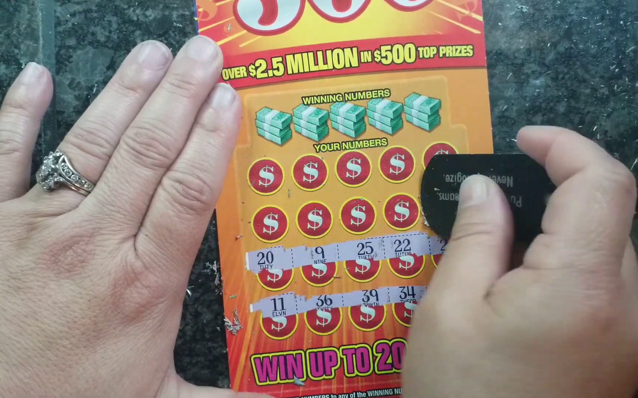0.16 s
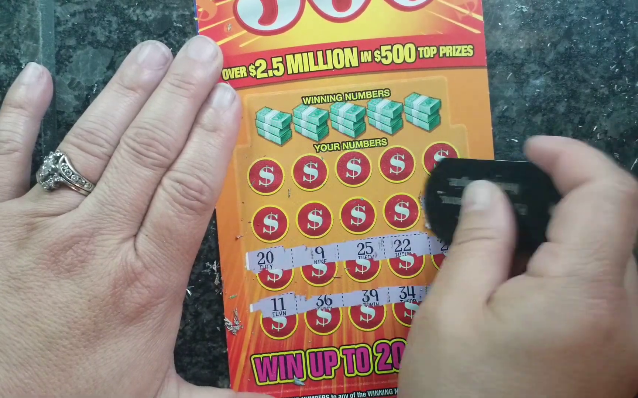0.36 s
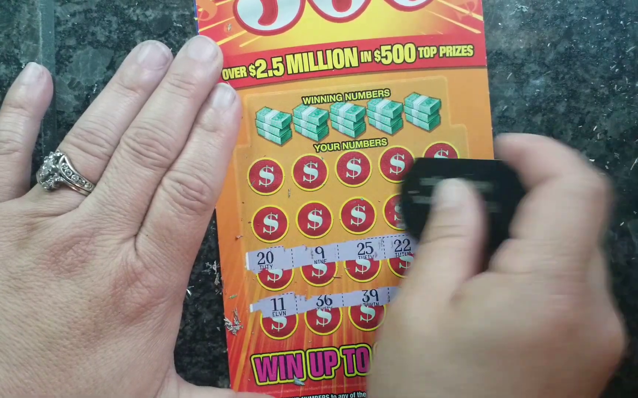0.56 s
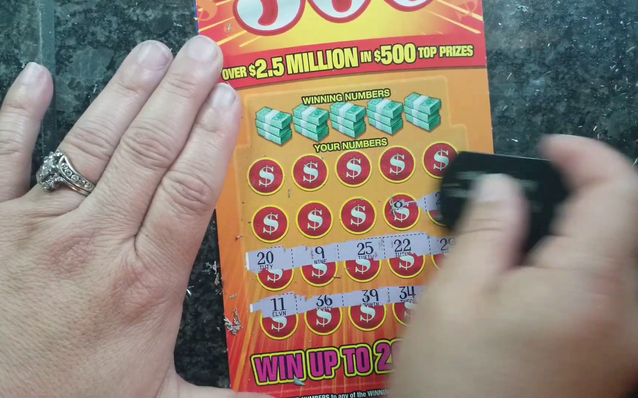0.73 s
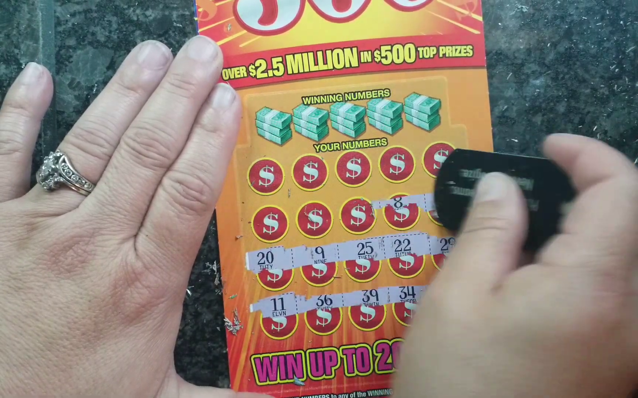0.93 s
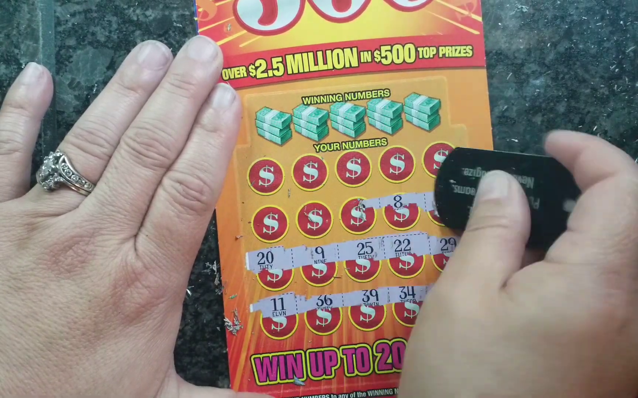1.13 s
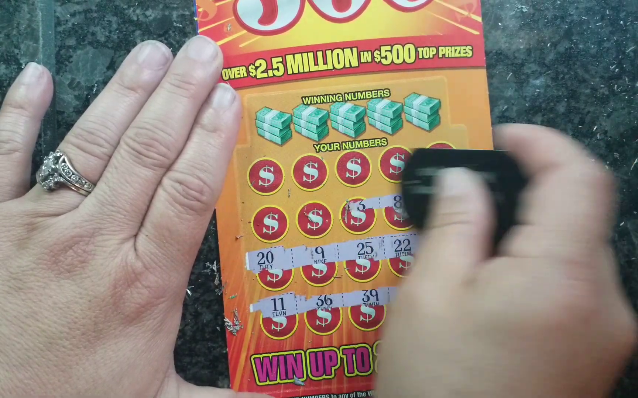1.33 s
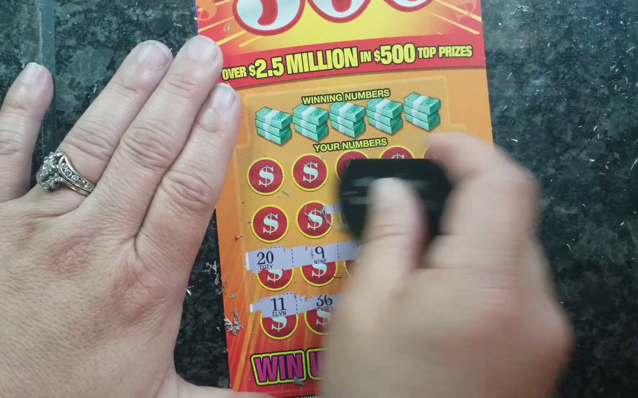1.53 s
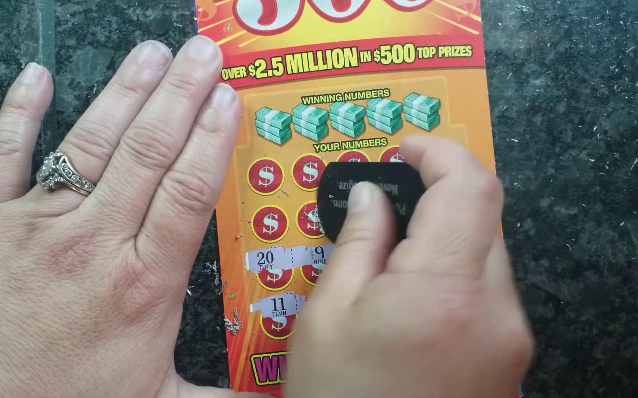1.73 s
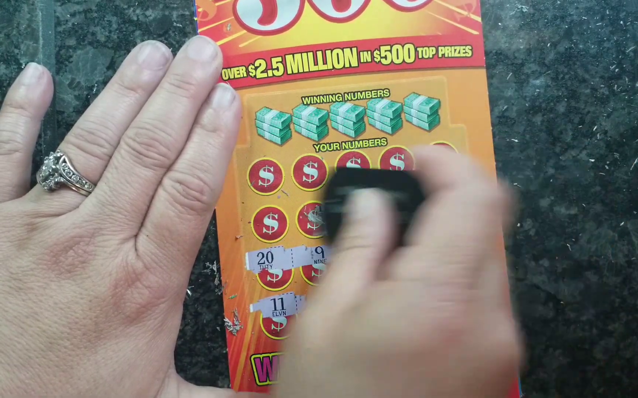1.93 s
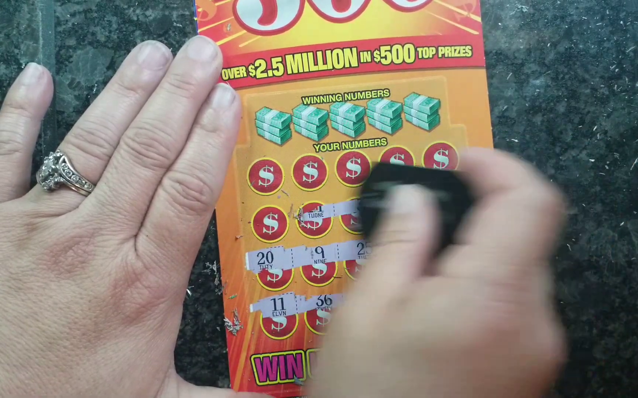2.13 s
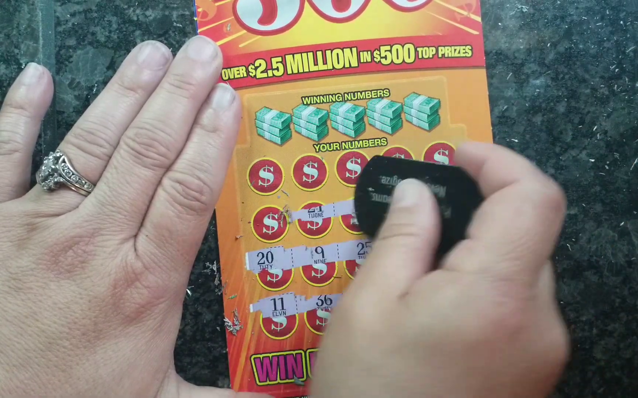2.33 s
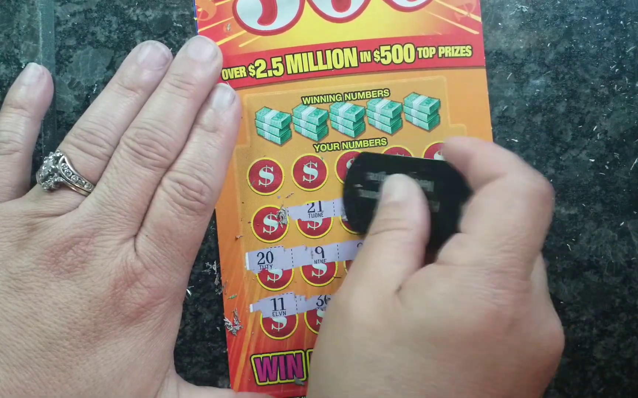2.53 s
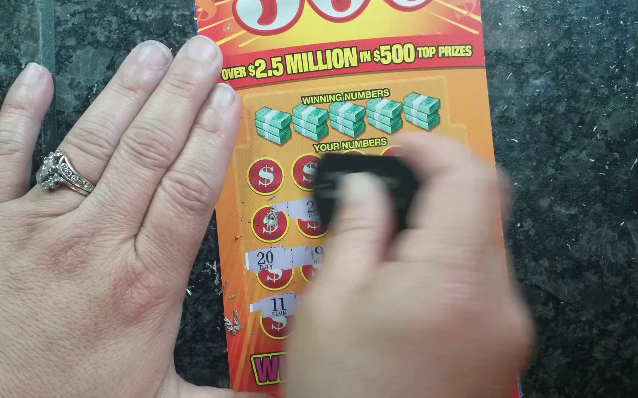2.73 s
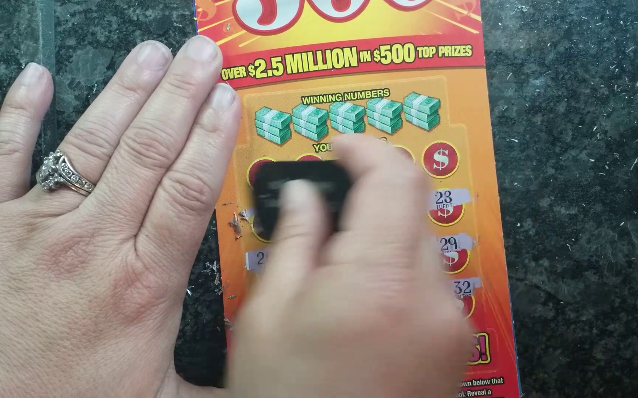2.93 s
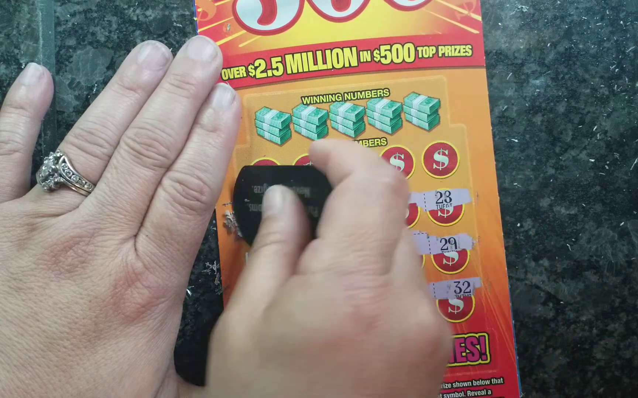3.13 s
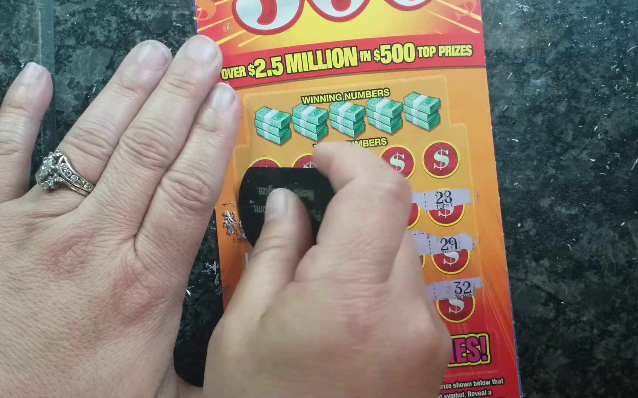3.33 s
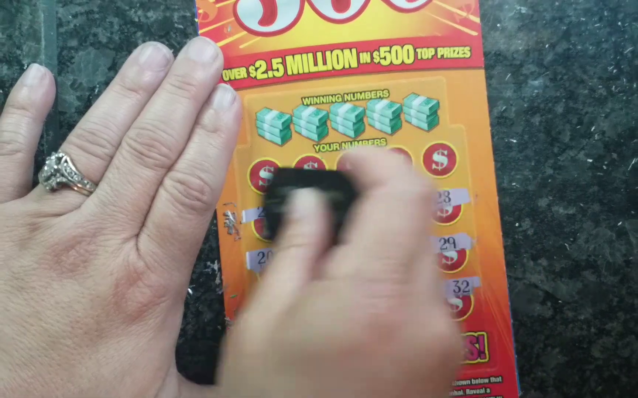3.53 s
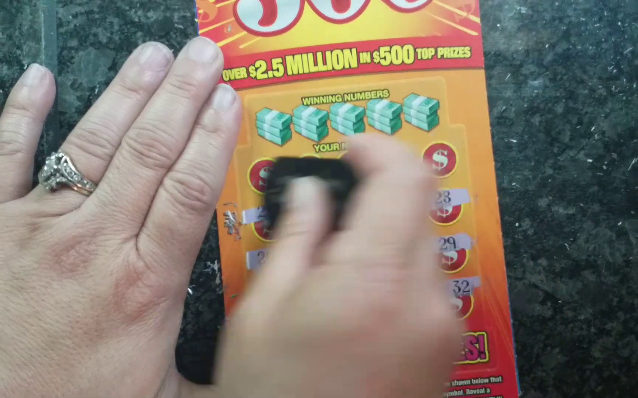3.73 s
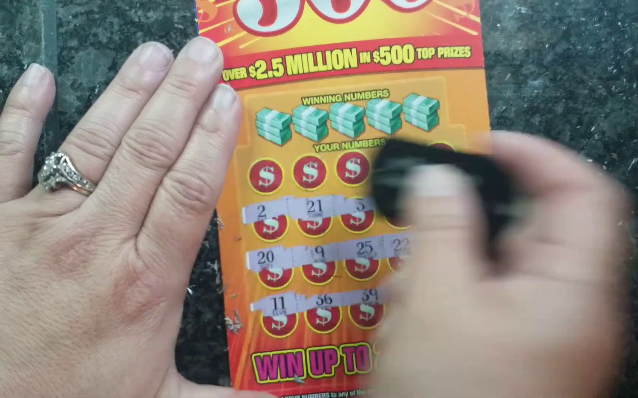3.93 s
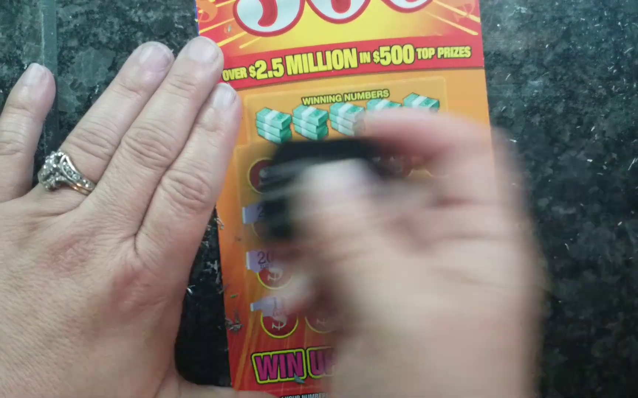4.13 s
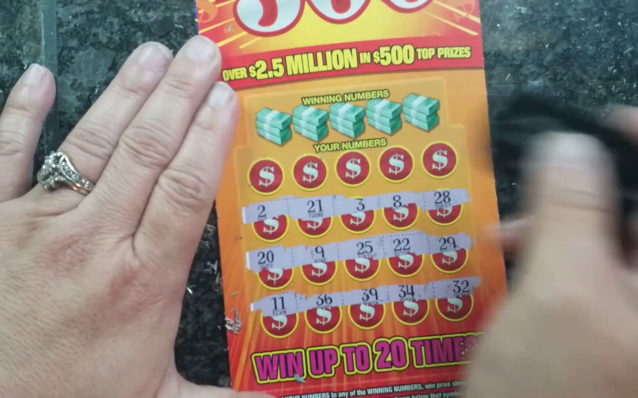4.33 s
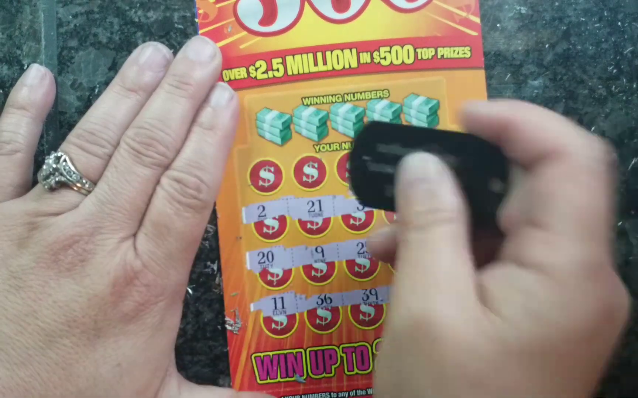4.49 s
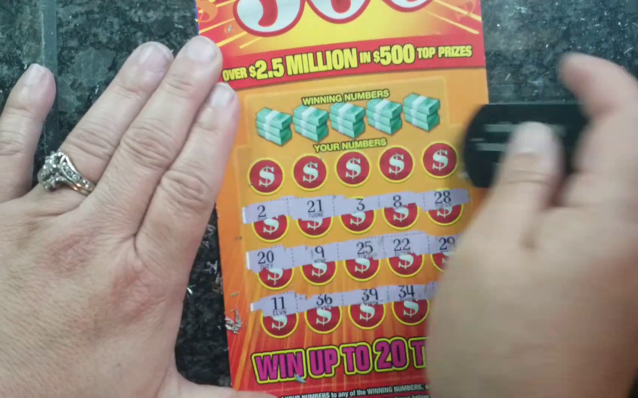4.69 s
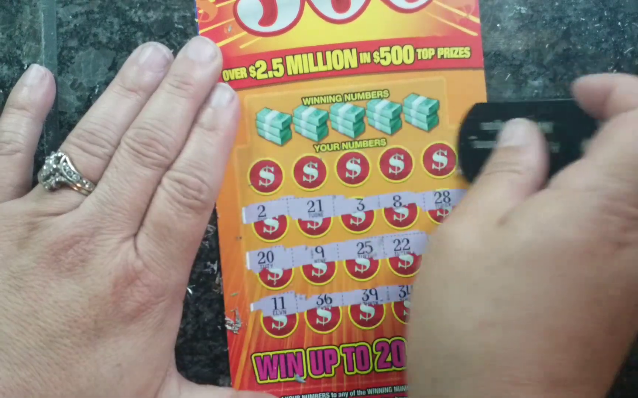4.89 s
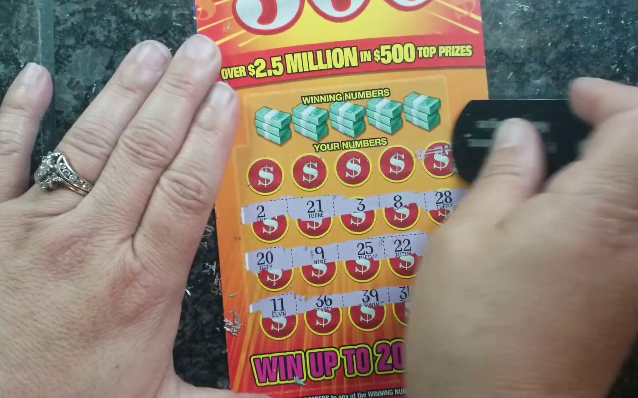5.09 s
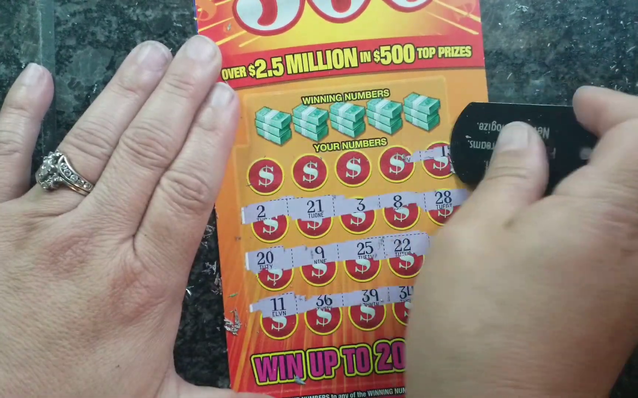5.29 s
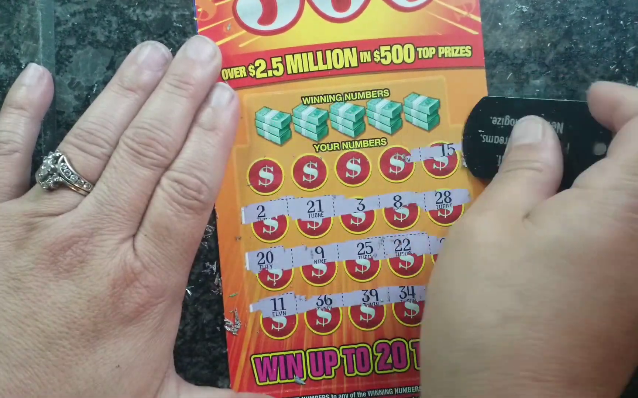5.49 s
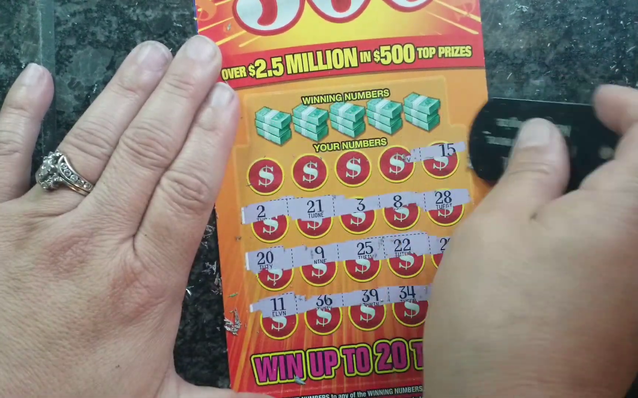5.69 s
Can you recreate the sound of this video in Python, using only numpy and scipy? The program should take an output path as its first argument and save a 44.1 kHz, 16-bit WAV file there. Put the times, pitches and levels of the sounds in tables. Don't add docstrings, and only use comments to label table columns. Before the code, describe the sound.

Rapid papery rasps, pushes fuller and pulls more edgy, with gritty crackle, small snags and faint low counter thuds beneath. After almost four seconds they stop; a hard click, a lighter knock and soft sweeping fill about a second. Then a slightly thinner scraping starts again at the right and continues until the cut. Two close microphones look down in a hushed indoor room.

```python
import sys
import numpy as np
from scipy import signal
from scipy.io import wavfile
from scipy.ndimage import uniform_filter1d, map_coordinates

SR = 44100
rng = np.random.default_rng(int(sys.argv[2]) if len(sys.argv) > 2 else 0)


def dump_mix(stems):
    frames = np.atleast_2d(stems).T
    limited = np.clip(frames, -1, 1)
    pcm = np.round(limited * 32767).astype(np.int16)
    wavfile.write(sys.argv[1], SR, pcm)


def undo_db(level):
    steps = np.asarray(level, float) / 20
    return 10 ** steps


N = 253575
TIME_S = np.arange(N) / SR

# frequency in Hz, level in dB per Hz.
ROOM_TONE = [(20, -40), (30, 0), (45, -2), (65, 6.5), (95, -12), (160, -7), (230, -12), (350, -16),
             (600, -18.5), (1000, -18.5), (3000, -20.5), (7000, -27), (12000, -20), (15000, -31)]
# frequency in Hz, likeness from 0 to 1.
LIKENESS = [(40, 0.31), (150, 0.45), (300, 0.2), (650, 0.5), (1400, 0.02), (15000, 0.0089)]
ROOM_DB = -70

# time in seconds, left port's delay in samples, left minus right in dB.
TAG_PLACE = [(0, 0.5, 2), (1.4, 0.94, 0.6), (1.75, -1.5, 0.3), (2.9, -2, 1.5), (3.2, -3, 1.5),
             (4.4, -2, 2.2), (4.95, 1.06, 1.5), (5.75, 0.16, 1)]
# time in seconds, stiffness of the sheet under it in dB,
# resting contact between strokes in dB, echo off the hand in ms.
GRIP = [(0, 0.5, -74, 0.35), (.4, 1.5, -70, 0.33), (.62, 1, -69, .34), (.85, -2, -83, 0.35),
        (1.1, 1, -69, 0.33), (1.4, 1, -70, .34), (1.75, -0.5, -71, .34), (2.0, -3.5, -71, .34),
        (2.3, 1.5, -72, 0.33), (2.6, 1.5, -65, 0.33), (2.9, 0, -71, 0.33), (3.3, 0.5, -64.5, .34),
        (3.6, -1, -65, 0.333), (3.88, -0.5, -66, 0.37), (3.95, -4, -95, .34), (4.93, 1.5, -91, .34),
        (5.0, -0.5, -78, 0.35), (5.75, 0, -75, 0.35)]
ECHO_S, ECHO_GAIN = .00153, 0.32

# frequency in Hz, width in Hz, level in dB.
SWAY_MODES = [(73.6, 18, -10), (87.8, 28.7, -8), (125.7, 10, -4)]
THUD_MODES = [(164.3, 19, -4), (183, 56, -6.5)]
RUMBLE_MODES = [(294.6, 50, -3.5), (513, 57, -6.5), (581, 170, -9.5), (828, 210, -9)]
# time in seconds, sway in dB.
LEAN = [(0, -68), (0.5, -71.5), (1.5, -65.5), (3.8, -66.5), (4.15, -75), (4.8, -78), (5.3, -73),
        (5.75, -65)]
# start in seconds, length in seconds, sway in dB, thud in dB, rumble in dB.
BUMPS = [(0.0, 0.024, -65, -53.5, -100), (0.62, 0.061, -80, -61, -74), (0.82, 0.028, -58, -85, -96),
         (3.903, 0.042, -80, -68.5, -75), (4.049, 0.012, -53, -61, -83), (4.249, 0.11, -67, -61, -75.5),
         (4.333, 0.043, -74, -44, -55), (4.382, 0.033, -78, -48, -56.5), (4.442, 0.2, -81, -78, -72.5),
         (4.583, 0.085, -59, -52.5, -71), (4.985, 0.023, -58, -67.5, -80.5), (5.216, 0.036, -71, -63, -73),
         (5.293, 0.089, -60.5, -51, -71), (5.62, 0.033, -71, -81, -70.5), (5.745, 0.029, -66, -56, -74)]
BUMP_RISE_S, BUMP_FALL_S = 0.015, 0.084
PUSH_THUD_DB, RESTING_THUD_DB, SWAY_WOBBLE_DB = -30.5, -83.5, 3.5

# start in seconds, length in seconds, level in dB,
# centre in Hz, width in Hz.
RUBS = [(3.942, 0.069, -73.5, 5100, 4000), (4.089, 0.027, -70, 5100, 3500), (4.115, 0.012, -75, 4500, 3000),
        (4.23, 0.056, -86, 2800, 2500), (4.331, 0.11, -61.5, 1900, 1800), (4.39, 0.17, -65, 2900, 2520),
        (4.552, 0.13, -74.5, 3030, 3000), (4.56, 0.093, -77, 7100, 1500), (4.627, 0.051, -71.5, 5800, 2500),
        (4.623, 0.032, -78, 2480, 2000), (4.664, 0.15, -74, 6850, 1830), (4.697, 0.18, -79.5, 3300, 2500),
        (4.8, 0.047, -68, 7000, 2500), (4.8465, 0.068, -61.5, 2980, 1500), (4.962, 0.17, -56, 3000, 4240)]

# time in seconds, peak in dB, thud in dB, crack decay in seconds,
# brightness in dB per octave.
TAPS = [
    (4.3308, -20.5, -52.5, 0.035, 0),
    (4.4426, -41.5, -73, 0.0075, -6),
    (4.572, -62, -81, 0.013, 0.1),
    (4.8015, -75, -102, 0.024, 0.1),
    (4.8448, -40, -93, 0.008, 0),
]
# time in seconds, peak in dB.
HEEL_THUDS = [
    (0.387, -45.5),
    (0.63, -43),
    (1.294, -47.5),
    (2.923, -47),
    (4.046, -57),
]
# frequency in Hz, level in dB, time to fall 60 dB in seconds.
KNOCK = [(95, 6.5, 0.038), (183, 2.5, 0.024), (270, -12, 0.086), (577, 6.5, 0.016), (736, 3, 0.057)]
CLINK = [(1586, 2, 0.028), (2000, -6.5, 0.022), (2624, -1, 0.024), (3300, -1, 0.0097), (4730, 5, 0.017),
         (5480, -2.5, 0.051), (6170, 9.5, 0.007), (7280, 1.5, 0.04)]

# frequency in Hz, width in Hz, level in dB.
TICKET = [(1961, 140, -15), (2292, 110, -24.5), (3422, 657, -5.5), (4225, 600, 2), (5064, 770, -4.5),
          (6750, 2600, -5), (6895, 960, 1.5), (9140, 3000, -7.5), (12100, 2100, -30), (12440, 1400, -22.5)]
TAG = [(2650, 24, -64), (4486, 53, 3), (7070, 350, 3), (7746, 150, 0.5), (10200, 520, -2.5)]
# bite in seconds, hold in seconds, level in dB, swell over the hold in dB, edge ring in dB.
PUSHES = [(0.0, 0.024, -42, -3.5, -3), (0.184, 0.038, -43, 11, -0.5), (0.39, 0.045, -38, -3, -3),
          (0.624, 0.034, -39.5, -19, 0), (0.827, 0.04, -35.5, -2, -1.5), (1.024, 0.057, -38, 12.5, -2.5),
          (1.252, 0.058, -41, 20, -6), (1.484, 0.062, -39, 7.5, -1), (1.735, 0.046, -39, 10.5, -3),
          (1.956, 0.067, -36.5, 11, -2), (2.206, 0.057, -40.5, 16, -5), (2.431, 0.055, -39, 9.5, 0.5),
          (2.659, 0.066, -38.5, 3, -0.5), (2.886, 0.085, -45, -4, -2.5), (3.112, 0.061, -43.5, 13, 0.5),
          (3.361, 0.033, -38.5, 5, 1), (3.589, 0.042, -40, 3, -1), (3.785, 0.057, -38, 3, -2),
          (4.982, 0.039, -37.5, 8, 3.5), (5.185, 0.043, -39.5, 0.5, 4), (5.421, 0.02, -39.5, 2, 4),
          (5.614, 0.029, -43, 9, 0.5)]
PULLS = [(0.071, 0.0071, -53.5, 27, -5.5), (0.286, 0.032, -38.5, 0.5, -1.5),
         (0.492, 0.034, -54.5, -11, -11), (0.712, 0.014, -38.5, 6, 2.5), (0.928, 0.034, -39.5, -11.5, -2),
         (1.138, 0.048, -43.5, 3.5, 3), (1.364, 0.057, -41, 2, 0.5), (1.593, 0.019, -43, 15, -6),
         (1.848, 0.054, -47, -12, -1), (2.075, 0.011, -43.5, 15.5, -2), (2.328, 0.053, -42.0, -12, -0.5),
         (2.565, 0.039, -39.5, -3.5, 0.5), (2.788, 0.042, -45, 11, -1), (3.014, 0.045, -40, -3.5, 0.5),
         (3.201, 0.076, -51, 9, -8.5), (3.458, 0.055, -49, -2, -3.5), (3.704, 0.025, -44.5, 10, 1.5),
         (3.883, 0.033, -53, 8.5, -3), (5.088, 0.033, -42, -7.5, -2), (5.297, 0.046, -40, -3, 1),
         (5.506, 0.046, -41, 7, 1.5), (5.705, 0.095, -54.5, 15, -1.5)]
SLIDES = [(0.123, 0.011, -58, -25, 1.5), (0.527, 0.0031, -50.5, 14.5, 4), (0.588, 0.043, -58, -4, -3),
          (0.965, 0.0057, -44.5, -13, 4.5), (1.629, 0.038, -58.5, -13, 5.5),
          (2.101, 0.049, -52.5, -10, -4.5), (2.932, 0.038, -39, -13.5, -15), (3.246, 0.012, -46, -10, 5),
          (3.293, 0.0026, -68, -16, 3), (3.682, 0.031, -60.5, -5, 7.5), (4.34, 0.046, -42.5, 9, 2),
          (4.861, 0.053, -61.5, -0.5, 8)]
CREEP_S, BITE_S, LET_GO_S, TRAIL_S = 0.025, 0.022, 0.016, 0.025
CREEP_DB, LET_GO_DB, STROKE_GAIN_DB = -27, -16.5, 2.5
# paper body, edge ring, sizzle and paper boom, all in dB.
PUSH_COLOUR, PULL_COLOUR = (0, -1.5, -3, 2.5), (1.5, 2, -1.5, -7.5)
SLIDE_COLOUR = (-0.5, -5, 4.5, -1.5)
USUAL_DB, SIZZLE_PER_DB = -41, 0.7
FIRMNESS_SIZZLE = 0.074
NEW_ROW_S, NEW_ROW_BODY_DB, NEW_ROW_AIR_DB, NEW_ROW_LOW_DB = 4.8, -1.5, -13, 12.5
# time in seconds, peak in dB.
SNAGS = [(0.0812, -37), (0.2762, -23), (0.3865, -29), (0.4923, -36), (0.53, -32), (0.623, -12),
         (0.7068, -33), (0.822, -38), (0.841, -21.5), (0.9207, -26), (1.0225, -22), (1.078, -12),
         (1.181, -26), (1.281, -22.5), (1.3019, -20), (1.377, -23), (1.413, -37), (1.524, -14),
         (1.5995, -26), (1.736, -31), (1.756, -18), (1.775, -38), (1.846, -31), (1.951, -18.5),
         (1.9689, -21), (2.0822, -35), (2.2528, -20), (2.322, -24), (2.556, -29), (2.655, -39),
         (2.9282, -9.5), (3.0116, -29), (3.1423, -21), (3.248, -33), (3.297, -26.5), (3.3747, -21),
         (3.5867, -30.5), (4.327, -28), (4.3303, -19), (4.8452, -46), (4.9792, -29), (5.084, -27),
         (5.181, -20), (5.204, -16), (5.289, -15), (5.3395, -22.5), (5.4182, -27), (5.4995, -29.5),
         (5.6127, -40), (5.6332, -28)]
# time in seconds, loss in dB.
SKIPS = [(0.373, 7), (0.416, 1.5), (0.63, -0.5), (0.958, 8), (1.16, 0.5), (1.29, 7), (1.386, 7.5),
         (1.765, -2), (2.35, 13), (2.59, 3), (2.826, 4.5), (2.907, 3.5), (3.041, 13), (5.098, 4),
         (5.307, 11.5), (5.327, 2), (5.436, 3.5)]
# time in seconds, gain in dB.
SURGES = [(0.087, 9.5), (0.184, 3), (0.32, 2.5), (0.388, 1.5), (0.437, 3.5), (0.617, -4.5), (0.625, -6),
          (0.643, 6.5), (0.669, -17), (0.7, -0.5), (0.723, -1), (0.743, -10), (0.862, 4.5), (0.928, 0.5),
          (1.022, 6.5), (1.05, 5), (1.08, 0.5), (1.13, -2), (1.206, 9.5), (1.264, 4.5), (1.282, 7),
          (1.361, -9.5), (1.406, -4.5), (1.523, 3.5), (1.542, -3.5), (1.972, 5), (1.99, 6.5), (2.006, 2),
          (2.316, 3), (2.388, -7), (2.418, 6.5), (2.449, -0.5), (2.458, 2.7), (2.489, -2.5), (2.5, 2),
          (2.577, -7), (2.619, -18), (2.647, -0.5), (2.657, 3.8), (2.701, 2.8), (2.801, -5), (2.84, 7.5),
          (2.932, 2), (2.973, -6), (3.144, 6), (3.378, 0), (3.472, 1), (3.615, 2.5), (3.852, 2),
          (5.094, -2.5), (5.107, 1.5), (5.177, 6.5), (5.201, 4.3), (5.285, 10), (5.296, 1.5), (5.309, 4.5),
          (5.361, -10), (5.452, 8), (5.514, -6.5), (5.554, -4)]
SKIP_S, SURGE_S = 0.0034, 0.0039
# frequency in Hz, change in dB per sample of delay.
RIGHTWARD = [(2000, 0.57), (3400, -0.45), (4200, -0.42), (5200, 1.7), (6800, -1.94), (7150, 1.5),
             (10000, 0), (13000, -4.5)]
MIDDLE_LATE, AIR_DB = -1.7, 15.5
# time in seconds, flapping of the sheet in dB, openness to the ports in dB.
HOLD_DOWN = [(0, 6.5, -12), (.15, -3.5, 9.5), (.5, 1, 0), (.62, 5, -19), (.8, 0, -5), (1.4, 0.5, -11),
             (1.75, 1, -3.5), (2.3, 1, -1.5), (2.6, -2.5, 2), (2.9, 1.5, -4), (3.3, 3.5, -5),
             (3.6, 3, -1.5), (3.9, 1.5, -5), (4.3, -7, -12), (4.45, -19, 15), (4.95, -2, -4), (5.2, 2, -14),
             (5.75, -3, 0)]


def rms_one(x):
    return x / np.sqrt(np.mean(x ** 2) + 1e-20)


def in_time(rows):
    s, *columns = np.transpose(rows)
    return [np.interp(TIME_S, s, column) for column in columns]


def at_hz(points, hz):
    table_hz, values = np.transpose(points)
    return np.interp(np.log(hz), np.log(table_hz), values)


def drift(rate):
    r = np.exp(-16 * np.pi * rate / SR)
    noise = rng.standard_normal(N // 8 + 4002)
    slow = rms_one(signal.lfilter([1], [1, -2 * r, r * r], noise)[4000:])
    return np.interp(np.arange(N) / 8, np.arange(len(slow)), slow)


def resonance(x, hz, width_hz):
    r = np.exp(-np.pi * width_hz / SR)
    feedback = [1, -2 * r * np.cos(2 * np.pi * hz / SR), r * r]
    return signal.lfilter(np.array([1, 0, -1]) * (1 - r * r) / 2, feedback, x)


def ring(clicks, hz, t60):
    r, w = undo_db(-60 / (t60 * SR)), 2 * np.pi * hz / SR
    return signal.lfilter([0, np.sin(w)], [1, -2 * r * np.cos(w), r * r], clicks + 1e-18)


def cut(x, kind, hz, order):
    return signal.sosfilt(signal.butter(order, hz, kind, fs=SR, output="sos"), x)


def placed(x):
    late, pan_db = in_time(TAG_PLACE)
    n = np.arange(N)
    left = map_coordinates(x[0], [n - late], order=3, mode="nearest")
    both = np.array([left, x[1]])
    hand_delay_s = np.clip(in_time(GRIP)[2] / 1000 + .00002 * drift(5.7), 1e-4, 1e-3)
    off_hand = n - SR * hand_delay_s
    both += 0.45 * np.array([np.interp(off_hand, n, side) for side in both])
    lag = round(ECHO_S * SR)
    both[:, lag:] += ECHO_GAIN * both[:, :-lag].copy()
    return both * undo_db(np.array([pan_db, -pan_db]) / 2)


def room():
    out, edges = 0, 22 * 2 ** np.arange(0, 9.6, .5)
    white = rng.standard_normal((2, 2, N))
    for k, (low, high) in enumerate(zip(edges, edges[1:])):
        mid, side = cut(white[k % 2], "band", [low, high], order=2)
        hz = np.sqrt(low * high)
        alike = np.clip(at_hz(LIKENESS, hz), 0, 1)
        stereo = np.sqrt(1 + alike) * mid + np.sqrt(1 - alike) * side * [[1], [-1]]
        out = out + undo_db(at_hz(ROOM_TONE, hz)) * stereo
    return undo_db(ROOM_DB + 1.5) * rms_one(out)


def walls(x):
    t = np.arange(11000) / SR
    tail = rng.standard_normal((2, len(t))) * undo_db(-60 * t / 0.18) * (t > .004)
    return undo_db(-43.0) * signal.fftconvolve(x, cut(tail, "low", 11000, order=1), axes=1)[:, :N]


def pressure(strokes):
    power = np.zeros(N)
    for s, hold, db, swell_db, _ in strokes:
        steps = [-CREEP_S - BITE_S, CREEP_S, BITE_S, max(hold, .001), LET_GO_S, TRAIL_S]
        knots = s + np.cumsum(steps)
        a, b = np.clip((knots[[0, -1]] * SR).astype(int), 0, N)
        begin, end = db - swell_db / 2, db + swell_db / 2
        shape_db = [begin - 45, begin + CREEP_DB, begin, end, end + LET_GO_DB, end - 45]
        power[a:b] += undo_db(np.interp(TIME_S[a:b], knots, shape_db)) ** 2
    return np.sqrt(power)


def shaken(modes, level_db):
    out = 0
    for hz, width_hz, db in modes:
        apart = .2 * (hz / 160) ** 1.4
        noise = rng.standard_normal(N) + apart * rng.standard_normal((2, N))
        tone = resonance(resonance(noise, hz, width_hz), hz, 3 * width_hz)
        out = out + undo_db(level_db + db) * rms_one(tone)
    return out


def hand():
    sway = undo_db(in_time(LEAN)[0])
    push_thud = undo_db(PUSH_THUD_DB) * uniform_filter1d(pressure(PUSHES), size=1500)
    thud = np.hypot(push_thud, undo_db(RESTING_THUD_DB))
    power = np.array([sway, thud, np.full(N, 1e-6)]) ** 2
    for s, length, *levels_db in BUMPS:
        near = slice(max(int((s - BUMP_RISE_S) * SR), 0), int((s + length + BUMP_FALL_S) * SR))
        knots = s + np.cumsum([-BUMP_RISE_S, BUMP_RISE_S, length, BUMP_FALL_S])
        shape_db = np.interp(TIME_S[near], knots, [-42.5, 4.5, -8.5, -40.5])
        power[:, near] += np.outer(undo_db(np.array(levels_db)) ** 2, undo_db(shape_db) ** 2)
    sway_db, thud_db, rumble_db = 10 * np.log10(power)
    swaying = shaken(SWAY_MODES, sway_db) * undo_db(SWAY_WOBBLE_DB * drift(6))
    return swaying + shaken(THUD_MODES, thud_db) + shaken(RUMBLE_MODES, rumble_db)


def brush():
    out = np.zeros((2, N))
    for start, length, db, hz, width_hz in RUBS:
        a, n = round(start * SR), round(length * SR)
        noise = rng.standard_normal(8000) + .7 * rng.standard_normal((2, 8000))
        band = rms_one(resonance(resonance(noise, hz, width_hz), hz, 0.91 * width_hz))[:, :n]
        swell = np.sin(np.pi * np.linspace(0, 1, n) ** 0.28) ** 0.93
        out[:, a:a + n] += undo_db(db) * band * swell
    return out


def taps():
    sharp, bright_db, dull, heel, crack = np.zeros((5, N))
    for s, peak_db, thud_db, decay, tilt_db in TAPS:
        i = round(s * SR)
        sharp[i], bright_db[i] = undo_db(peak_db - 15.5), tilt_db
        dull[i + 130] = undo_db(thud_db + 9.0)
        crack[i:i + 2000] += undo_db(peak_db - 6 - 60 * np.arange(2000) / SR / decay)
    for s, peak_db in HEEL_THUDS:
        heel[round(s * SR)] = undo_db(peak_db - 7.0)
    clink = undo_db(-20.0) * cut(crack * rng.standard_normal(N), "high", 660, order=2)
    for k, (hz, db, t60) in enumerate(CLINK):
        strike = sharp * undo_db(bright_db * np.log2(hz / 4000))
        clink = clink + (-1) ** k * undo_db(db) * ring(strike, hz, t60)
    soft = -cut(dull + cut(heel, "low", 300, order=2), "band", [90, 600], order=2)
    knock = sum(undo_db(db) * ring(soft, hz, t60) for hz, db, t60 in KNOCK)
    return placed(np.array([clink, clink])) + knock


def grit(per_s, spread_db):
    sizes = undo_db(spread_db * np.minimum(rng.exponential(1, N), 4.5)) * rng.choice([-1, 1], N)
    return rms_one(sizes * (rng.random(N) < per_s / SR))


def snags():
    out = np.zeros(N)
    for s, peak_db in SNAGS:
        out[round(s * SR)] = undo_db(peak_db - 13.0)
    return signal.lfilter([1], [1, -undo_db(-60 / (0.022 * SR))], out + 1e-18)


def skips():
    t = np.arange(0, N, 40) / SR
    loss_db = sum(db * np.exp(-.5 * ((t - s) / SKIP_S) ** 2) for s, db in SKIPS)
    surge_db = sum(db * np.exp(-.5 * ((t - s) / SURGE_S) ** 2) for s, db in SURGES)
    return undo_db(np.interp(TIME_S, t, surge_db - loss_db))


def bite():
    rows = []
    for strokes, colour in ((PUSHES, PUSH_COLOUR), (PULLS, PULL_COLOUR), (SLIDES, SLIDE_COLOUR)):
        body, edge, sizzle, boom = colour
        for s, hold, db, _, ring_db in strokes:
            row_body = body + NEW_ROW_BODY_DB * (s > NEW_ROW_S)
            row_sizzle = sizzle + SIZZLE_PER_DB * (db - USUAL_DB)
            rows.append((s + hold / 2, row_body, edge + ring_db, row_sizzle, boom))
    return in_time(sorted(rows))


def scrape():
    body_db, edge_db, sizzle_db, boom_db = bite()
    new_row = TIME_S > NEW_ROW_S
    flap_db, open_db = in_time(HOLD_DOWN)
    air_db = AIR_DB + NEW_ROW_AIR_DB * new_row + open_db
    stiff_db, resting_db, _ = in_time(GRIP)
    rightward = in_time(TAG_PLACE)[0] - MIDDLE_LATE

    strokes = undo_db(STROKE_GAIN_DB) * skips() * pressure([*PUSHES, *PULLS, *SLIDES])
    judder = undo_db(1.0 * drift(60) + 1.9 * drift(300))
    push = np.hypot(strokes, snags() + undo_db(resting_db)) * judder
    push_db = 20 * np.log10(uniform_filter1d(push, size=200) + 1e-4)
    sizzle_db = sizzle_db + FIRMNESS_SIZZLE * (push_db - USUAL_DB)

    common, out = grit(4000, spread_db=4.1), 0
    for k, (hz, width_hz, db) in enumerate(TICKET + TAG):
        shared = .42 * common + .3 * grit(5000, spread_db=3.6)
        own = .6 * rng.standard_normal((2, N))
        alike = np.clip(.97 - hz / 50000, 0, 1)
        drive = push * (np.sqrt(alike) * shared + np.sqrt(1 - alike) * own)
        colour_db = body_db if hz < 5700 else edge_db if hz < 8400 else sizzle_db
        colour_db = colour_db + at_hz(RIGHTWARD, hz) * rightward
        if hz < 2100:
            colour_db = colour_db + boom_db
        elif hz < 2500:
            colour_db = colour_db - 0.46 * boom_db + NEW_ROW_LOW_DB * new_row
        elif hz < 3800:
            colour_db = colour_db + flap_db
        elif hz < 5700:
            colour_db = colour_db + stiff_db
        elif hz > 11000:
            colour_db = colour_db + air_db
        peak = cut(resonance(drive, hz, width_hz), "high", 0.82 * min(hz, 4000), order=4)
        out = out + (-1) ** k * undo_db(db + colour_db + 1.6 * drift(25)) * peak
    return undo_db(7.5) * placed(out)


def scene():
    close = scrape() + taps()
    return room() + walls(close) + hand() + brush() + close


def roll_off(x):
    return signal.sosfilt(signal.butter(12, 15630, fs=SR, output="sos"), x)


def record(dry):
    mix = signal.sosfilt(signal.ellip(10, .5, 70, 14480, fs=SR, output="sos"), dry)
    return roll_off(mix)


dry = scene()
out = record(dry)
dump_mix(out)
```